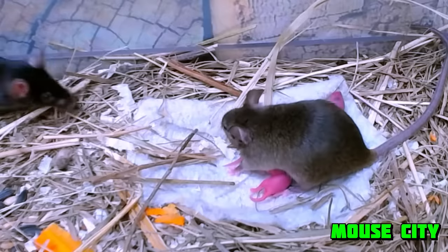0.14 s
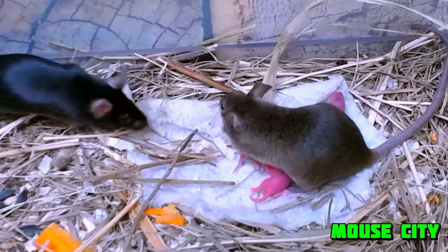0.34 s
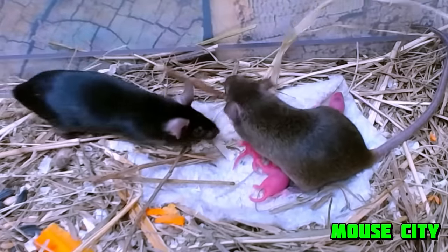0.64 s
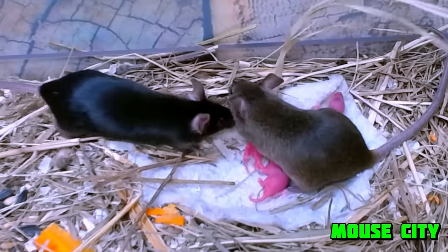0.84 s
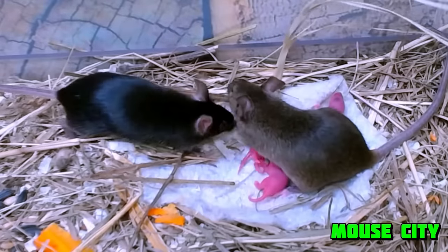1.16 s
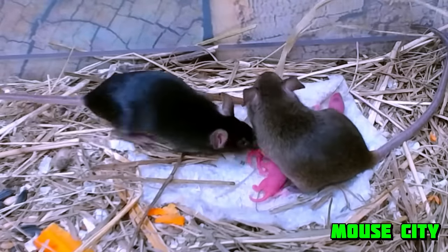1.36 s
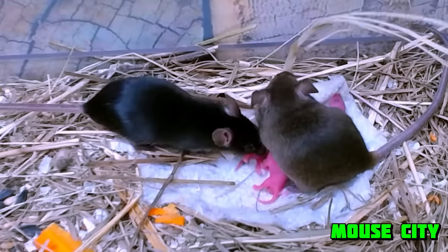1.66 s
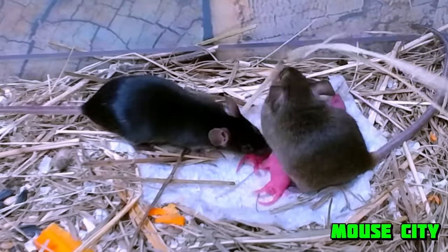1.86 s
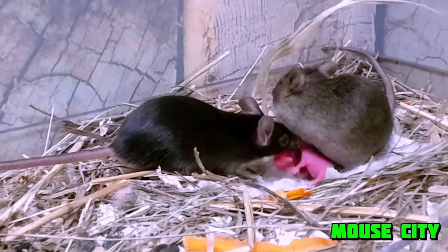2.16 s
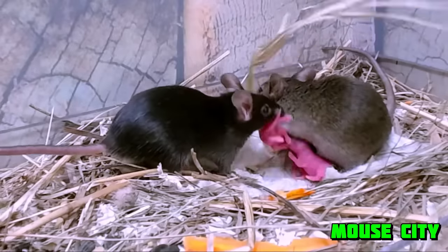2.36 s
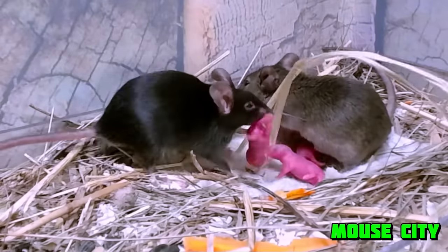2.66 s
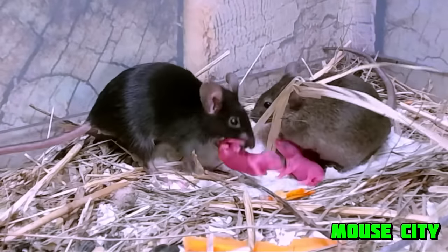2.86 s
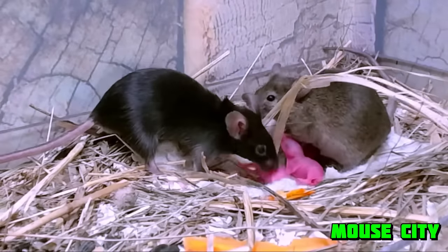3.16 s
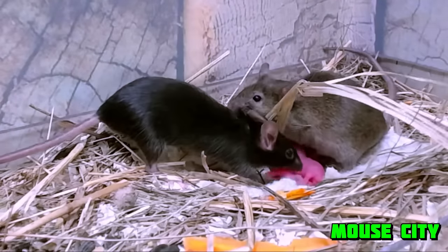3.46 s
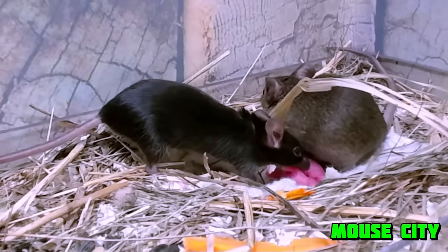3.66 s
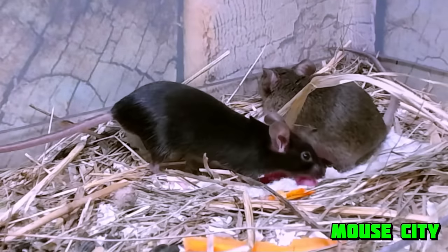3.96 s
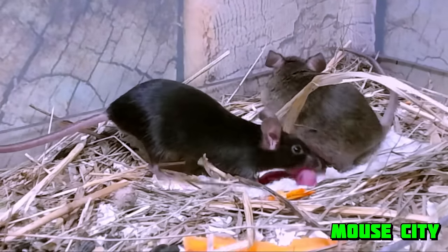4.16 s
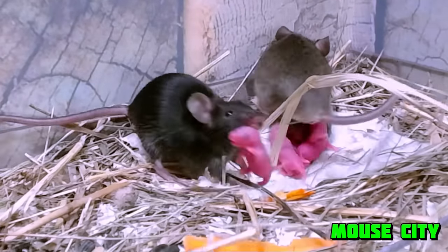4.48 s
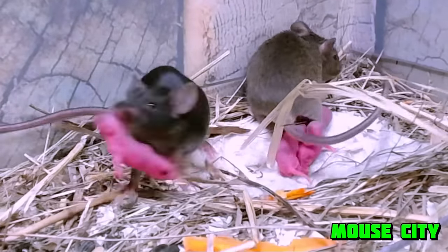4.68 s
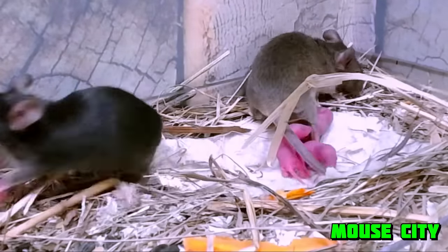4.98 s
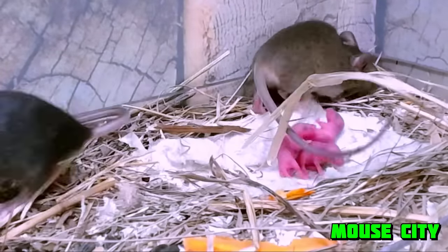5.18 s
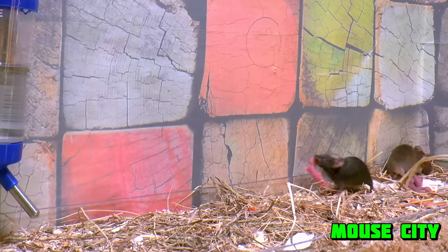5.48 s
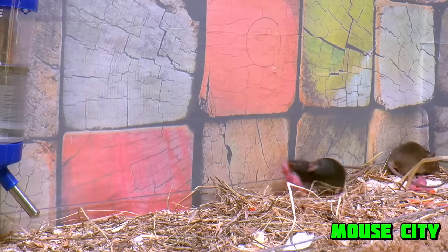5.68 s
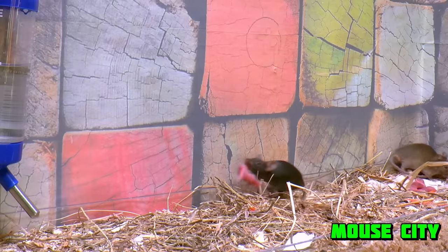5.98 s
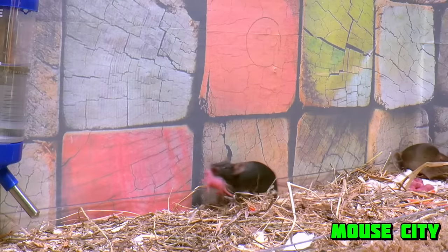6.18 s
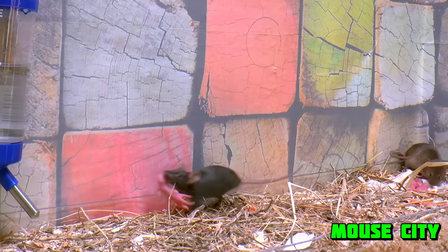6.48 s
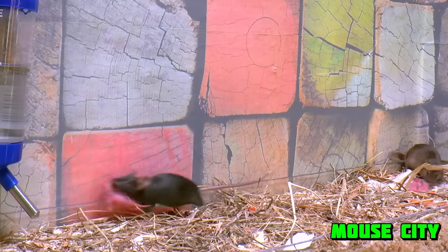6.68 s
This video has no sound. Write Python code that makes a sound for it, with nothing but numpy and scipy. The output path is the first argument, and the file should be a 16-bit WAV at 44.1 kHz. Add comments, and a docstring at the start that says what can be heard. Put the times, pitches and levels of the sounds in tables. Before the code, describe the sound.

A close stereo microphone hears a small cage bedded with hay in a quiet room, with soft air, low rumble, faint hum and a very thin pulsing whine. Hay rustles gently; a hollow double knock comes at 0.3 seconds, a straw snap near 0.65, and soft scuffs follow. From 2.1 seconds a pup squeaks: a rough low pair, then tiny rising and falling whistles near 2.3, 2.6, 2.9, 3.2 and 3.4, with a soft floor thump at 2.9. A sharper scuff lands at 3.86. Straw snaps and footfalls cluster around 4.3 to 4.6, then a longer squeak dips and rises at 4.8, followed by footsteps and snaps. At 5.4 the sound cuts to a wider, louder, hissier mono position. Brighter scuffs and snaps repeat, the last squeak returns at about 6.25, and loose straw crackle swells until the end at 6.8.

```python
"""A mouse pup squeaks as an adult picks it up and carries it off in a cage bedded with hay, indoors.
Each squeak is a gliding whistle with overtones and throat hiss that turns jagged when the voice is rough.
Grains of noise make the hay crackle; resonant noise makes footfalls and scuffs; straws snap, the floor knocks.
Shaped noise gives air and rumble; wavering sines give the fan and mains hum and the camera's thin pulsing whine.
Late on, a cut to a wider, louder position plays the last moments, with the last squeak, again."""
import sys
import numpy as np
from scipy import signal
from scipy.fft import rfft, irfft, next_fast_len
from scipy.io import wavfile

SR = 44100
rng = np.random.default_rng(int(sys.argv[2]) if len(sys.argv) > 2 else 0)


def unload_audio(sound):
    """Save the sound as a 16-bit wav file, at the path given as the first command line argument."""
    columns = np.transpose(np.atleast_2d(sound))
    # keep every value between -1 and 1, then stretch to whole-number steps
    steps = np.round(np.clip(columns, -1, 1) * 32767)
    wavfile.write(sys.argv[1], SR, steps.astype(np.int16))


N = 301644

CUT_S, REPLAY_S = 5.408, 1.445   # time of the cut, and how far it steps back


def from_db(db):
    """Decibels to amplitude gain."""
    return 10 ** (np.asarray(db) / 20)


def rms_one(x):
    """Scale to unit power."""
    return x / np.sqrt(np.mean(x ** 2) + 1e-20)


def clock():
    """Time of every sample in seconds."""
    return np.arange(N) / SR


def level(rows):
    """Gain along a curve of (t/s, level/dB) points."""
    return from_db(np.interp(clock(), *np.transpose(rows)))


def at_hz(points, hz):
    """Read a spectrum on a log-frequency axis."""
    f, value = np.transpose(points)
    return np.interp(np.log(hz + 1), np.log(f), value)


def drift(rate, size):
    """Random wander: normal draws, rate per second, joined by straight lines."""
    knots = rng.standard_normal(int(size / SR * rate) + 3)
    return np.interp(np.arange(size) / SR * rate, np.arange(len(knots)), knots)


def band(x, low_hz, high_hz):
    """Causal band-pass."""
    sos = signal.butter(2, [low_hz, min(high_hz, .45 * SR)], "band", fs=SR, output="sos")
    return signal.sosfilt(sos, x + 1e-18)


def coloured(pair, spectrum):
    """Two unrelated signals become the mid and side of a shaped stereo sound; its mono sum has rms 1."""
    # left-right likeness of the two microphone ports, held to 0-1 below: f/Hz, likeness
    likeness = [(30, 1), (130, 0.84), (290, 0.78), (640, 0.61), (1400, 0.15), (3100, -0.57), (6800, -0.4),
                (10000, 4.1), (15000, 1.6)]
    # their tonal balance: f/Hz, left minus right/dB
    balance = [(60, 1.5), (600, 0), (3000, 1.5), (6800, 3), (15000, -1)]
    size = next_fast_len(pair.shape[1] + 2000)
    hz = np.fft.rfftfreq(size, 1 / SR)
    mid, side = rfft(pair, size) * from_db(at_hz(spectrum, hz))
    alike = np.clip(at_hz(likeness, hz), 0, 1)
    width = np.sqrt((1 - alike) / (1 + alike))
    sign = np.array([[1], [-1]])
    ports = (mid + width * side * sign) * from_db(sign * at_hz(balance, hz) / 2)
    out = irfft(ports, size)[:, :pair.shape[1]]
    return out / np.std(out.mean(0))


def noise(spectrum):
    """Steady stereo noise with the given spectrum."""
    return coloured(rng.standard_normal((2, N)), spectrum)


def air_and_rumble(wide):
    """Shaped noise for the room's air at each position; low rumble joins it at the close one only."""
    # spectra of the air, close and wide: f/Hz, density/dB per Hz
    air_close = [(59, -27), (100, 5.5), (174, -2), (260, 1.5), (547, -11), (595, -6), (662, -9),
                 (970, -11.5), (1720, -19.5), (2040, -18.5), (3780, -25.5), (7940, -34), (16000, -53)]
    air_wide = [(15, -69.5), (25, -34), (53, -20), (97, -20.5), (137, -10.5), (170, -17), (256, -2.5),
                (531, -7.5), (775, -11.5), (840, -8), (2480, -17.5), (3820, -16), (5430, -24.5),
                (14800, -32.5), (16000, -39)]
    # loudness of the air, close and wide: t/s, level/dB
    air_close_path = [(0, -57), (1.0, -58), (2.0, -59), (2.5, -60.5), (3.6, -61.5), (4.6, -62.5),
                      (5.4, -61)]
    air_wide_path = [(5.4, -49.5), (6.1, -50.5), (6.84, -48)]
    # spectrum of the rumble: f/Hz, density/dB per Hz
    rumble_colour = [(20, -2.5), (35, 2), (50, 8.5), (65, 1), (95, -13), (140, -21), (250, -63)]
    # loudness of the rumble: t/s, level/dB
    rumble_path = [(0, -76), (.4, -58.5), (.5, -51.5), (.65, -62), (1.1, -60), (2.1, -64.5), (3.0, -62.5),
                   (4.2, -68.5), (4.9, -63.5), (5.4, -66)]
    close = level(air_close_path) * noise(air_close) + level(rumble_path) * noise(rumble_colour)
    return np.where(wide, level(air_wide_path) * noise(air_wide), close)


def fan_hum(wide, waver=0.00831):
    """Fan and mains hum: steady sines that wander slightly in pitch and level."""
    # hum tones: f/Hz, close level/dB, wide level/dB
    hum_tones = [(46.8, -81, -82), (256.3, -67.5, -57), (304.2, -78, -59), (647, -84.5, -67.5),
                 (765, -80, -64.5)]
    out = np.zeros(N)
    for hz, close_db, wide_db in hum_tones:
        phase = 2 * np.pi * np.cumsum(hz * (1 + waver * drift(20, N))) / SR
        gain = from_db(np.where(wide, wide_db, close_db) + 2 * drift(8, N))
        out += gain * np.sqrt(2) * np.sin(phase)
    return out


def camera_whine(waver=0.00087, pan_db=16.0, pictures_per_s=29.97):
    """Thin camera tones, stronger on the left, each pulsing once a picture until it stops."""
    # whine tones: f/Hz, level/dB, stop t/s
    whine_tones = [(6124, -72, 2.04), (7980, -78, 4.8)]
    out = np.zeros((2, N))
    for k, (hz, db, stop_s) in enumerate(whine_tones):
        # the two tones take turns within each picture
        turn = (-1) ** k * 2 * np.cos(2 * np.pi * (pictures_per_s * clock() + .3))
        pulse = np.clip(.5 + turn, 0, 1)
        phase = 2 * np.pi * np.cumsum(hz * (1 + waver * drift(220, N))) / SR
        gain = from_db(db + 2 * drift(29.56, N)) * pulse * (clock() < stop_s)
        out += gain * np.sqrt(2) * np.sin(phase) * from_db([[pan_db / 2], [-pan_db / 2]])
    return out


def background(wide):
    """Air and rumble, hum and whine, all outside the cage."""
    return air_and_rumble(wide) + fan_hum(wide) + camera_whine()


def crackle(per_s, clump_db):
    """Tiny straw cracks of uneven size: random single-sample grains whose level swells in clumps."""
    clumps = clump_db * (drift(110, N) + drift(25, N))
    sizes = from_db(2.7 * np.minimum(rng.exponential(1, N), 4) + clumps)
    return (rng.random(N) < per_s / SR) * sizes * rng.standard_normal((2, N))


def hay(wide):
    """Hay shifts under the feet: a soft dense rustle from the nest, then, at the wide position, loose straw."""
    # loudness of the hay: t/s, level/dB
    rustle_path = [(0, -67), (.7, -65.5), (1.5, -68), (2, -68), (3, -74.5), (4.2, -71), (4.6, -68.5),
                   (5, -68), (5.15, -65.5), (5.4, -67), (5.7, -65), (6.1, -55), (6.84, -49)]
    # spectra of the soft nest (close) and the loose straw (wide): f/Hz, density/dB per Hz
    nest_colour = [(1000, -10.5), (3000, -4), (4500, -6), (6500, 0), (9500, -0.5), (11500, -6.5),
                   (13500, -8), (16000, -11)]
    loose_colour = [(1000, -9), (3000, 1.5), (6000, -2.5), (9500, -3), (12500, -4.5), (16000, -2)]
    nest = coloured(crackle(per_s=14000, clump_db=1.3), nest_colour)
    loose = coloured(crackle(per_s=1700, clump_db=2.3), loose_colour)
    return level(rustle_path) * np.where(wide, loose, nest)


def bumps(gain_db=0, far_tilt_db=0, slip_db=3.0):
    """Feet press on the bedding and bodies brush hay and cage: resonant noise swells and dies at each contact."""
    # resonances of a footfall, then of a scuff: f/Hz, level/dB, spread of the band edges as a share of f
    foot_modes = [(400, -4.5, 0.47), (607, -1, 0.12), (1110, -7.5, 0.13), (1650, -19, 1)]
    scuff_modes = [(617, -17, 0.35), (913, -4, 0.076), (1398, -3.5, 0.085), (1924, -5.5, 0.13),
                   (2570, -16.5, 0.77)]
    # footfalls: peak t/s, level/dB
    footfalls = [(2.774, -54.5), (4.39, -62.5), (4.406, -52), (4.508, -59), (5.001, -49), (5.166, -54)]
    # scuffs: peak t/s, rise/s, fall/s, level/dB, brightness/dB per octave, middle resonance/dB
    scuffs = [(.105, 0.015, 0.055, -62.5, 8, 6.5), (.371, 0.025, 0.036, -53, -13, 5),
              (0.661, 0.038, 0.023, -70.5, 12, -3), (.835, 0.019, 0.022, -56.5, 4.5, -12),
              (.975, 0.014, .039, -83.5, 25, -10), (1.18, 0.053, 0.1, -55, -15, 1),
              (1.3, .04, 0.034, -56.5, -12, 9.5), (1.679, 0.017, 0.0077, -64, 12, -8),
              (1.939, .006, 0.022, -65, 12.5, -4), (2.02, 0.015, 0.0099, -57.5, -3, 7),
              (2.902, 0.018, 0.032, -51.5, -20.5, -6), (3.857, .004, .023, -42, -2.5, -12.5),
              (3.915, 0.026, 0.038, -64, 8, -19), (4.742, .012, 0.018, -68.5, 12.5, -18),
              (4.83, 0.052, 0.096, -60, -10, -6), (5.003, 0.017, .025, -61.5, -4, 5)]
    foot_rise_s, foot_fall_s = .012, 0.01
    # the place of contact favours or starves the middle resonance
    middle_hz, middle_octaves = 1400, .15
    contacts = [(s, foot_rise_s, foot_fall_s, db, 0, 0, foot_modes) for s, db in footfalls]
    contacts += [(*row, scuff_modes) for row in scuffs]
    out = np.zeros(N)
    for s, rise, fall, db, tilt_db, middle_db, modes in contacts:
        span = slice(max(int((s - 3 * rise) * SR), 0), int((s + 6 * fall) * SR))
        t = clock()[span] - s
        envelope = np.exp(np.where(t < 0, -(t / rise) ** 2, -t / fall))
        # the contact catches and slips
        swell = envelope * from_db(slip_db * drift(159, len(t)))
        for hz, mode_db, spread in modes:
            colour_db = (tilt_db + far_tilt_db) * np.log2(hz / 1000)
            colour_db += middle_db * np.exp(-(np.log2(hz / middle_hz) / middle_octaves) ** 2)
            hiss = rng.standard_normal(len(t))
            ring = rms_one(band(hiss, hz / (1 + spread), hz * (1 + spread)))
            out[span] += from_db(gain_db + db + mode_db + colour_db) * swell * ring
    return out


def knocks(contact_s=0.0015):
    """A soft blow on the cage floor sets it ringing briefly: a hollow decaying sine with a rounded onset."""
    # knocks: t/s, level/dB, f/Hz, t60/s
    floor_knocks = [(.283, -27.5, 384, 0.051), (0.299, -31.5, 327, 0.082), (2.912, -38.5, 274, 0.14)]
    out = np.zeros(N)
    for s, db, hz, t60 in floor_knocks:
        age = np.maximum(clock() - s, 0)
        decay = from_db(db - 60 * np.minimum(age / t60, 4))
        out += decay * (1 - np.exp(-age / contact_s)) * np.sin(2 * np.pi * hz * age)
    return out


def snaps(gain_db, body_db, crack_db, ring_s=0.012):
    """A single straw breaks with a sharp noise crack and buzzes for a moment in two bands."""
    # snaps: t/s, level/dB, lower band minus upper band/dB
    straw_snaps = [(.66, -52, -6), (1.2292, -69, 20), (1.662, -55, -7), (4.1, -71, 7.5), (4.314, -60, -10),
                   (4.432, -58.5, 1), (4.462, -54, -5.5), (4.543, -60, -9), (4.614, -55, -20),
                   (5.078, -52, -7.5), (5.2, -58, 1), (5.222, -59.5, -20), (5.263, -85, 26),
                   (5.284, -53, -23)]
    out, age = np.zeros(N), np.arange(SR // 20) / SR
    for s, db, low_db in straw_snaps:
        low, top, crack = rng.standard_normal((3, len(age)))
        buzz = from_db(low_db + body_db) * rms_one(band(low, 3600, 7700))
        buzz += rms_one(band(top, 7500, 10400))
        crack = rms_one(band(crack, 4000, 16000)) * np.exp(-age / .0012)
        snap = buzz * np.exp(-age / ring_s) + from_db(crack_db) * crack
        at = int(s * SR)
        out[at:at + len(age)] += from_db(db + gain_db) * snap
    return out


def glide(t, s, pitch):
    """A smooth cubic path through the pitch points."""
    slope, step = np.gradient(pitch, s), np.diff(s)
    i = np.clip(np.searchsorted(s, t) - 1, 0, len(step) - 1)
    u = (t - s[i]) / step[i]
    rise = np.diff(pitch)[i] * u * u * (3 - 2 * u)
    bend = step[i] * u * (1 - u) * (slope[i] * (1 - u) - slope[i + 1] * u)
    return pitch[i] + rise + bend


def squeak(contour, call, voice, shimmer_db=3.0, half_tone_db=-27.0,
           rasp_release_s=0.015, lead_s=.001, release_s=0.0016):
    """One call: a gliding whistle with overtones, jagged when rough; gives stereo tone and stereo rasp level."""
    effort_db_per_octave = 2.5   # a higher note is pushed harder
    slack_hz, slack_rough_per_octave = 3770, 0.86   # below this pitch the voice turns rough
    start_rough = .5   # extra roughness while the voice catches
    break_s, break_rough = 0.0066, 0.73   # it also breaks up as the call ends
    burst_bright_db, burst_rasp_db = 16.5, 5   # first push of air: overtones per octave, and rasp
    rough_rasp_db, rough_tone_loss_db = 11, 6   # when fully rough, tone gives way to rasp
    rasp_follows = 0.33   # share of the effort's swing
    (call_db, attack_s, push_s, fade_db, fundamental_db, swell_db,
     overtones_db, roughness, rasp_db, pan_db) = call

    s, pitch = np.transpose(contour)
    s = np.sort(s) + np.arange(len(s)) / SR   # keeps the points apart
    span = slice(int((s[0] - lead_s) * SR), int((s[-1] + 6 * rasp_release_s) * SR))
    t = clock()[span]
    held = np.clip(t, s[0], s[-1])
    note = glide(held, s, pitch)
    # the rasp outlasts the tone
    releases = np.exp(-np.maximum(t - s[-1], 0) / [[release_s], [rasp_release_s]])
    gates = np.clip((t - t[0]) / attack_s, 0, 1) * releases

    progress = (held - s[0]) / (s[-1] - s[0])
    burst = np.exp((s[0] - held) / push_s)
    tension = np.log2(note / slack_hz)
    edges = start_rough * np.exp((s[0] - held) / attack_s)
    edges += break_rough * np.exp((held - s[-1]) / break_s)
    slack = slack_rough_per_octave * np.maximum(-tension, 0)
    rough = np.clip(roughness + slack + edges, 0, 1)
    effort_db = call_db + effort_db_per_octave * tension + fade_db * progress
    bright_db = overtones_db + burst_bright_db * burst
    rasp_push_db = burst_rasp_db * burst + rough_rasp_db * rough
    rasp = from_db(rasp_db + rasp_push_db + rasp_follows * (effort_db - call_db))

    # rough folds scatter from cycle to cycle and lurch in pitch
    jitter = (.004 + .04 * rough) * drift(2500, len(t))
    lurch = .025 * rough * drift(220, len(t))
    hz = note * (1 + jitter + lurch)
    phase = 2 * np.pi * np.cumsum(hz) / SR
    partials = [(1, from_db(fundamental_db + swell_db * progress))]
    partials += [(k, from_db(bright_db * np.log2(k / 2))) for k in range(2, 8)]
    # alternating strong and weak cycles add tones between the partials
    partials += [(k + .5, from_db(half_tone_db) * rough) for k in range(1, 3)]
    scatter = .1 + .6 * rough
    tone_db = effort_db - rough_tone_loss_db * rough ** 2
    wave = 0
    # each partial flutters and smears on its own
    for k, gain in partials:
        weight = from_db(tone_db + at_hz(voice, k * note) + shimmer_db * drift(344.4, len(t)))
        sine = np.sqrt(2) * np.sin(k * phase + scatter * drift(1200, len(t)))
        wave = wave + gain * weight * sine * (k * hz < SR / 2)   # silent above the Nyquist limit
    out = np.zeros((2, 2, N))
    pan = from_db([[pan_db / 2], [-pan_db / 2]])
    out[:, :, span] = (np.array([wave, rasp]) * gates)[:, None] * pan
    return out


def pup(voice, rasp, rasp_db):
    """All the calls as heard from one position: voiced tones plus the turbulent hiss of the throat."""
    # pitch path of each squeak, one list a call: t/s, f/Hz
    contours = [
        [(2.075, 2840), (2.085, 3040), (2.104, 2420)],
        [(2.106, 2500), (2.128, 2690), (2.145, 2630), (2.168, 2375)],
        [(2.33, 3310), (2.338, 4190), (2.346, 4300), (2.358, 4040), (2.37, 3810)],
        [(2.575, 2350), (2.586, 3760), (2.597, 4190), (2.624, 4160), (2.64, 3780), (2.662, 3650), (2.688, 3870),
         (2.704, 3310), (2.717, 2780)],
        [(2.915, 3100), (2.92, 4140), (2.932, 4770), (2.937, 5050)],
        [(3.184, 2240), (3.192, 3150), (3.202, 3734), (3.216, 3530)],
        [(3.367, 2920), (3.373, 4180), (3.383, 4590), (3.402, 4350), (3.432, 3590), (3.439, 3114), (3.46, 2050),
         (3.483, 1920)],
        [(4.804, 1815), (4.815, 3650), (4.827, 4200), (4.84, 3850), (4.861, 2790), (4.872, 2640), (4.88, 3100),
         (4.9, 3220), (4.933, 3850), (4.943, 3700), (4.95, 2840)],
    ]
    # the same squeaks: level/dB, attack/s, first push/s, level change over the call/dB, fundamental/dB,
    # its swell over the call/dB, overtones/dB per octave, roughness (0-1), rasp/dB, left minus right/dB
    calls = [(-37, .002, 0.0017, 9.5, -19, -17, -45, 0.76, -66, 0),
             (-32, 0.0035, 0.0076, -2, -19.5, 11, -15, 0.36, -53, -2.5),
             (-45, 0.0025, 0.0027, -6.5, 0, 4.5, 4.5, 0.14, -44, -2),
             (-35.5, 0.0023, 0.024, -3.5, -9.5, 3, -18, 0, -51, -2.5),
             (-36.5, 0.0012, 0.0044, -6.5, -2, 14, -19, 0, -56, -4),
             (-34, 0.0068, 0.0053, -14.5, -0.5, -3.5, -10.5, 0.09, -51, -0.5),
             (-41, 0.0019, .006, -7, 0, 8, -16, 0.28, -53.5, -0.5),
             (-33.5, 0.013, 0.029, -6.5, -20, 15, -5, 0.18, -44, 1.5)]
    tone, hiss = sum(squeak(contour, call, voice) for contour, call in zip(contours, calls))
    return tone + hiss * from_db(rasp_db) * noise(rasp)


def cage(x, room_db=-11.0, sideways_db=-11.0, inside_db=-16.5, inside_t60_s=0.033, room_t60_s=0.16,
         dull_hz=11000, gap_s=.003):
    """Decaying noise echoes: a brief dense ring inside the glass cage and the faint tail of the room."""
    age = np.arange(SR // 2) / SR
    tail = coloured(rng.standard_normal((2, len(age))), [(100, 0), (dull_hz, 0), (20000, -12)])
    tail = tail * from_db(-60 * age / room_t60_s) * (age > gap_s)
    echo = from_db(room_db) * tail / np.linalg.norm(tail[0])
    # sound bouncing between the panes smears each glide
    bounces = rng.standard_normal((2, len(age))) * from_db(-60 * age / inside_t60_s)
    inside = band(bounces[0] * (age > gap_s), 2450, 26000)
    echo += from_db(inside_db) * inside / np.linalg.norm(inside)
    # part of it reaches the two ports out of step: opposite sign left and right
    sideways = band(bounces[1], 620, 8400)
    echo += from_db(sideways_db) * sideways / np.linalg.norm(sideways) * [[1], [-1]]
    return x + signal.fftconvolve(x, echo, axes=1)[:, :N]


def replayed(close, far):
    """The close sound up to the cut; after it the far sound, stepped back in time."""
    return np.where(clock() >= CUT_S, np.roll(far, int(REPLAY_S * SR), axis=-1), close)


def scene():
    """The mice and their bedding in the cage, over the room's background."""
    # throat and cage weight each partial by its frequency, close and wide: f/Hz, weight/dB
    voice_close = [(2000, -18), (3200, -.5), (3800, 3.5), (4100, 0.5), (4400, -12), (5300, -13),
                   (6300, -3.5), (7500, -3), (8500, 3), (10500, -1), (12500, -3), (14000, -6), (16000, -30)]
    voice_wide = [(2000, -2), (3200, 18), (3800, 20.5), (4150, 26.5), (5300, -1), (7500, 0.5), (9600, -1.5),
                  (11500, 5), (13000, 7.5), (14500, 15.5), (16000, 5)]
    # hiss of the throat, close and wide: f/Hz, density/dB per Hz
    rasp_close = [(1500, -4.5), (2700, -7), (3800, -3), (4900, -2), (7500, 0.5), (11000, 7), (13500, -13),
                  (15500, -9)]
    rasp_wide = [(1500, -6), (3500, 1.5), (5200, -2.5), (8000, 1.5), (11000, -5), (13500, -9),
                 (16000, -5.5)]
    wide = clock() >= CUT_S
    close = bumps() + snaps(gain_db=-3.0, body_db=-0.5, crack_db=-18)
    close = close + pup(voice_close, rasp_close, rasp_db=-15.0)
    # bumps from the wide position: gain at 1 kHz, and tilt per octave
    far = bumps(gain_db=12, far_tilt_db=5.5) + snaps(gain_db=4, body_db=6.5, crack_db=7)
    far = far + pup(voice_wide, rasp_wide, rasp_db=-0.5)
    return cage(replayed(close, far) + knocks() + hay(wide)) + background(wide)


def record(dry):
    """The wide position is summed to mono; a steep low-pass removes the top of everything."""
    mixed = np.where(clock() >= CUT_S, dry.mean(0), dry)
    low_pass = signal.ellip(12, .1, 80, 16100, fs=SR, output="sos")   # ripple/dB, stopband/dB, cutoff/Hz
    return signal.sosfilt(low_pass, mixed)


dry = scene()
out = record(dry)
unload_audio(out)
```